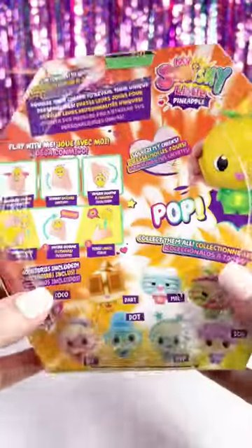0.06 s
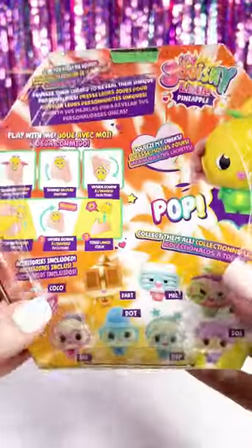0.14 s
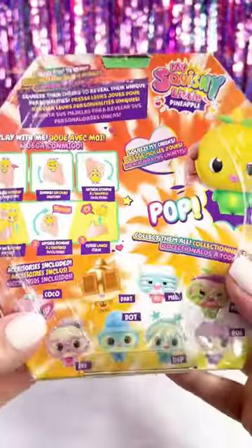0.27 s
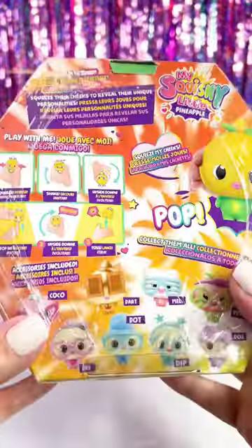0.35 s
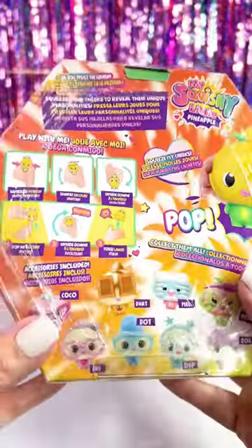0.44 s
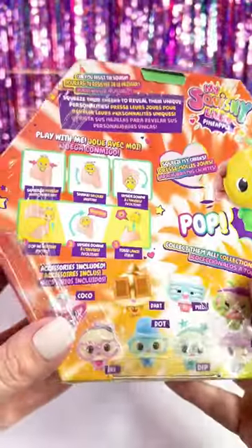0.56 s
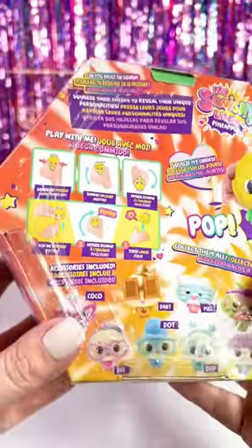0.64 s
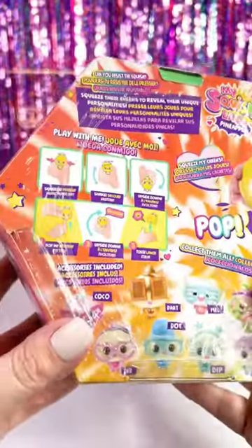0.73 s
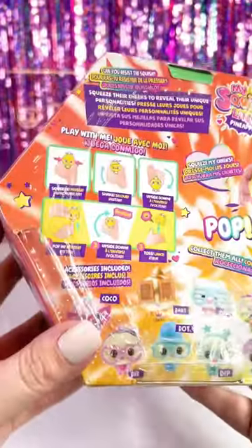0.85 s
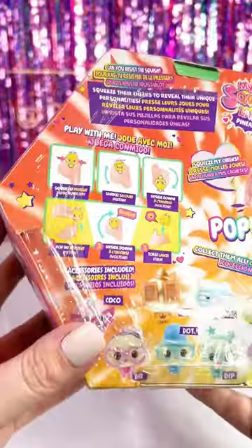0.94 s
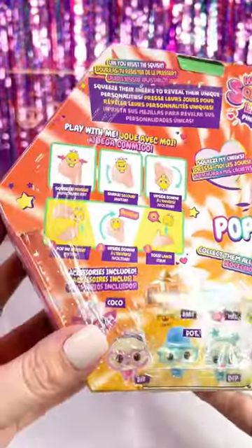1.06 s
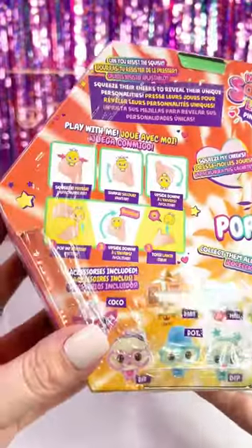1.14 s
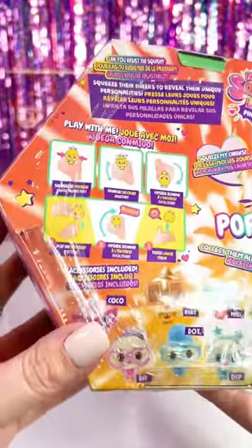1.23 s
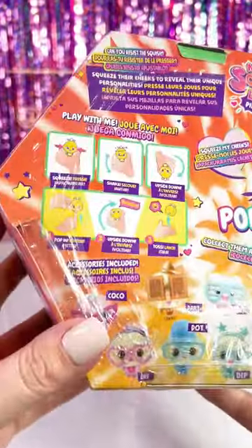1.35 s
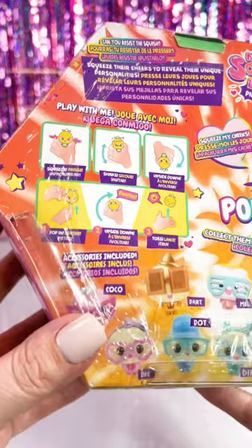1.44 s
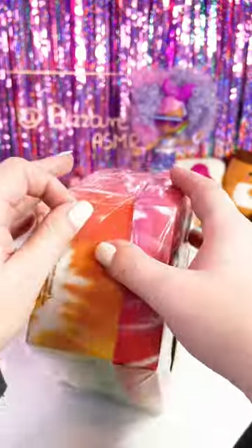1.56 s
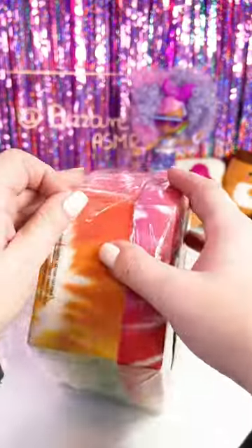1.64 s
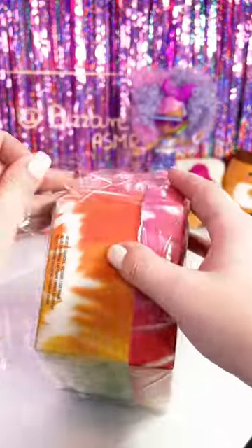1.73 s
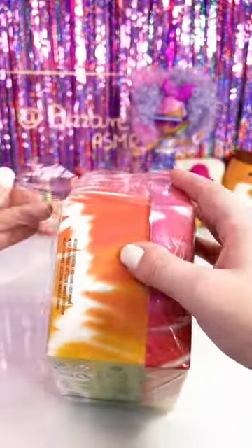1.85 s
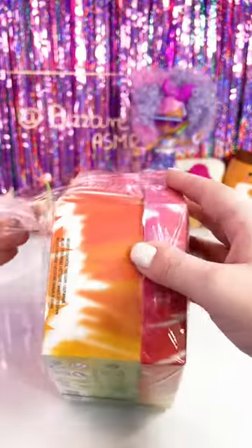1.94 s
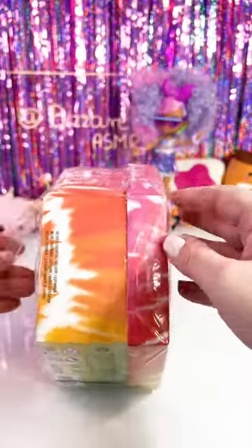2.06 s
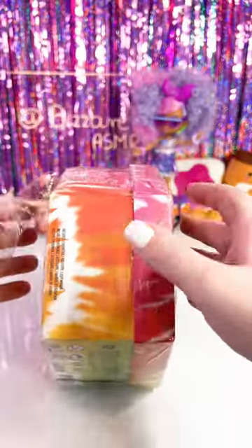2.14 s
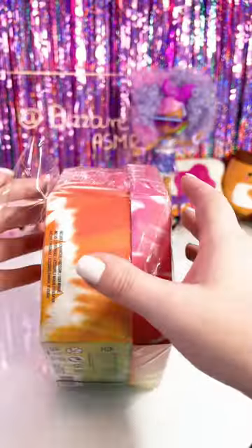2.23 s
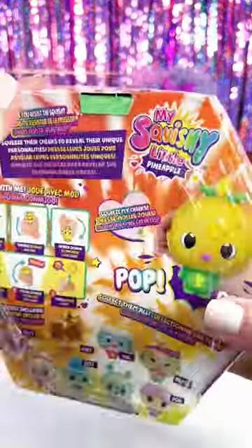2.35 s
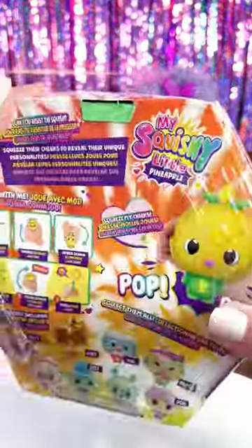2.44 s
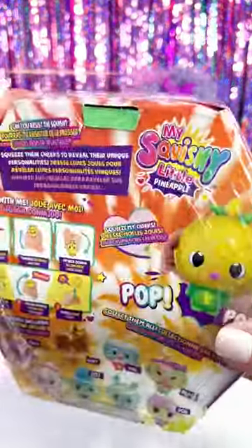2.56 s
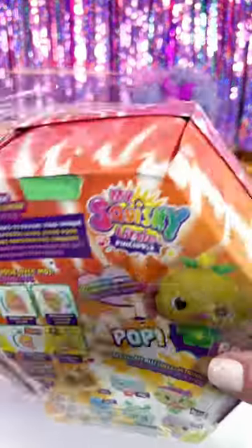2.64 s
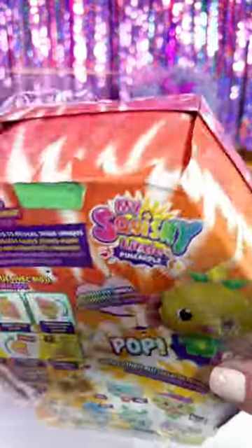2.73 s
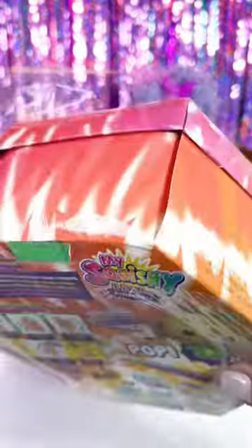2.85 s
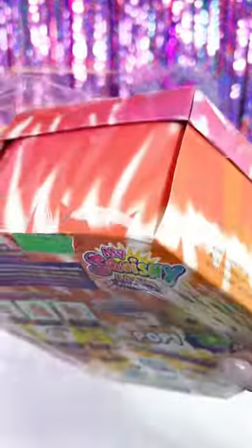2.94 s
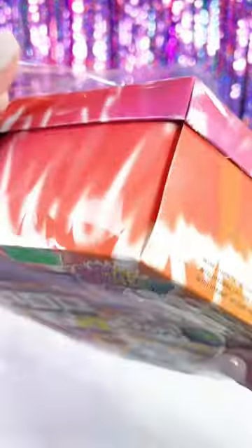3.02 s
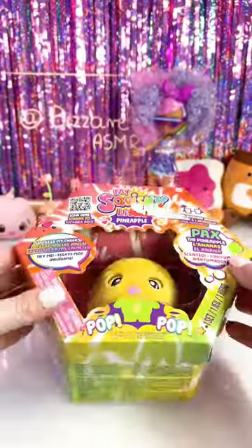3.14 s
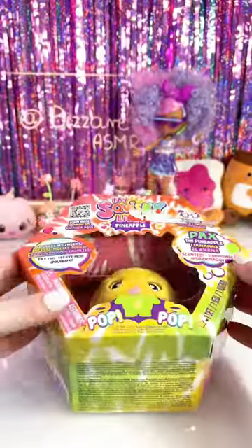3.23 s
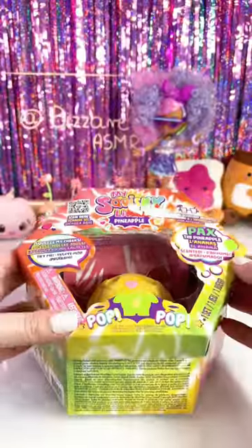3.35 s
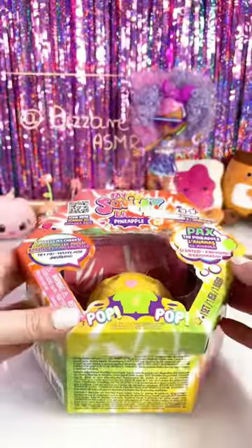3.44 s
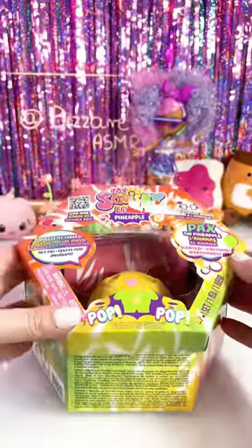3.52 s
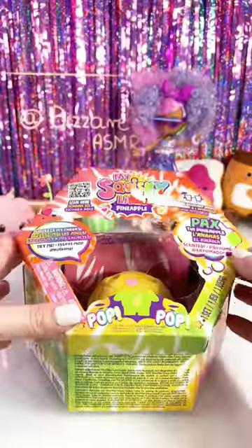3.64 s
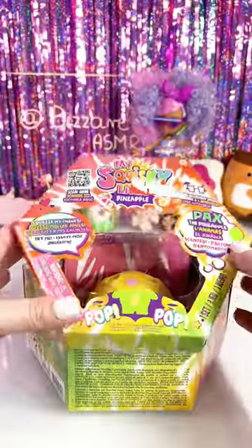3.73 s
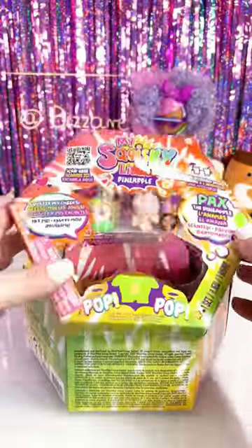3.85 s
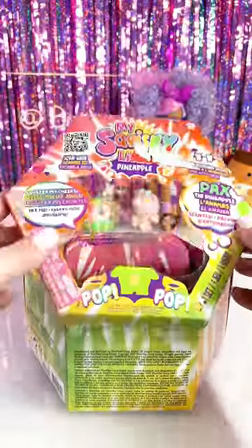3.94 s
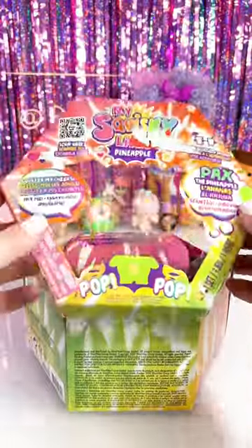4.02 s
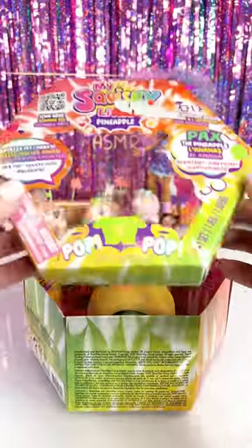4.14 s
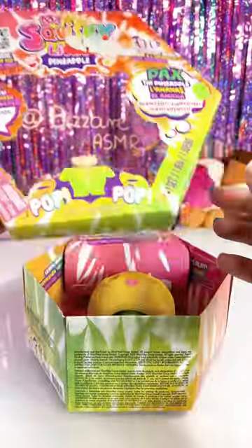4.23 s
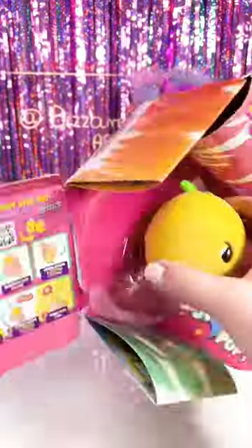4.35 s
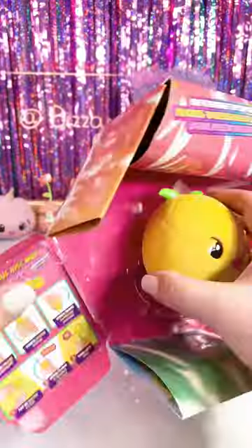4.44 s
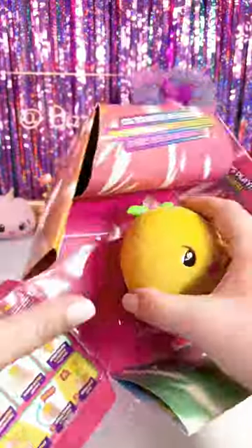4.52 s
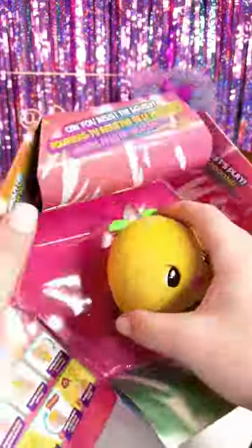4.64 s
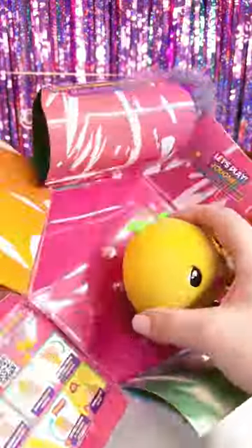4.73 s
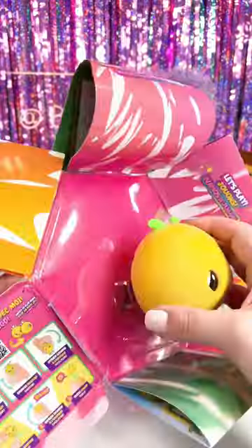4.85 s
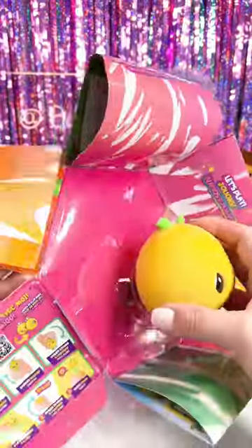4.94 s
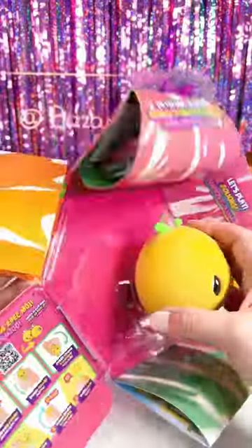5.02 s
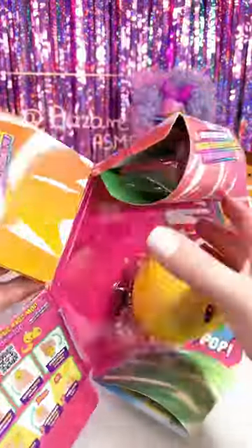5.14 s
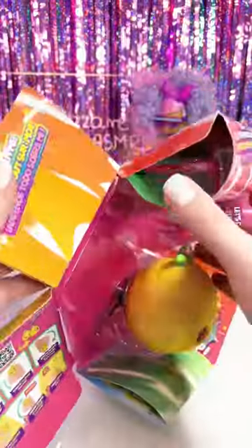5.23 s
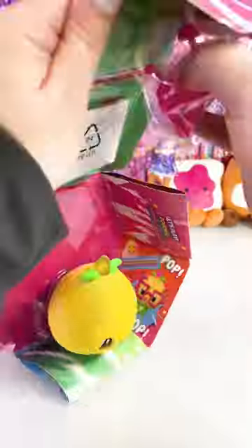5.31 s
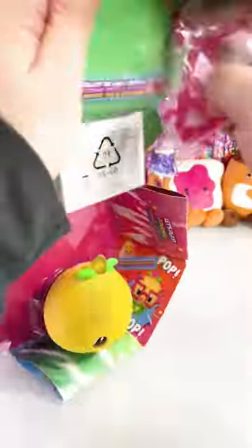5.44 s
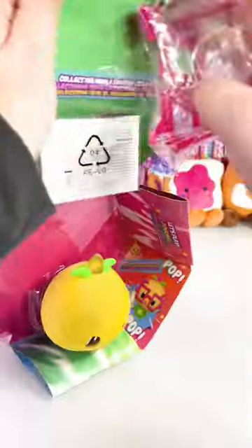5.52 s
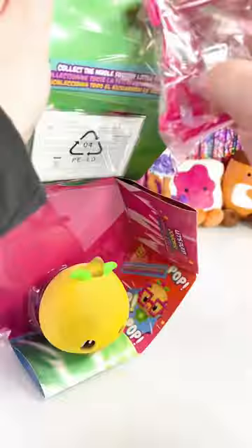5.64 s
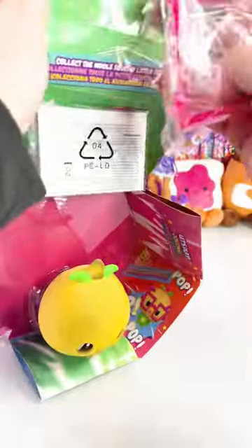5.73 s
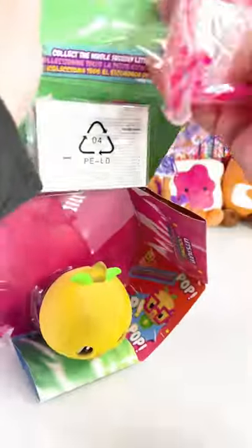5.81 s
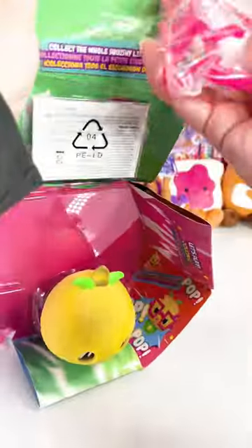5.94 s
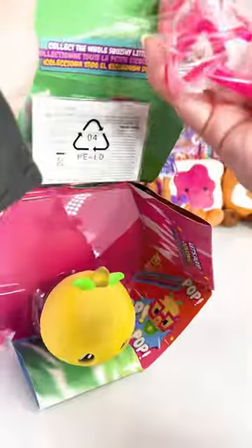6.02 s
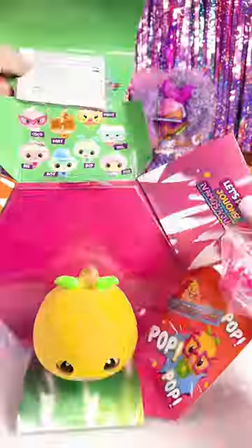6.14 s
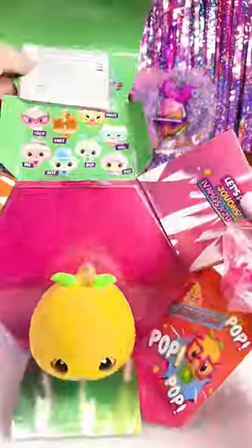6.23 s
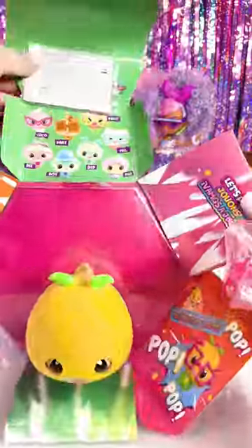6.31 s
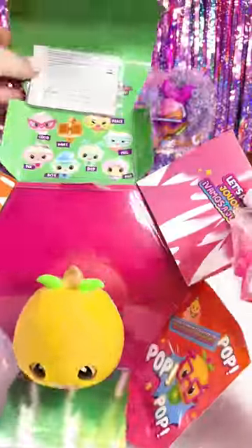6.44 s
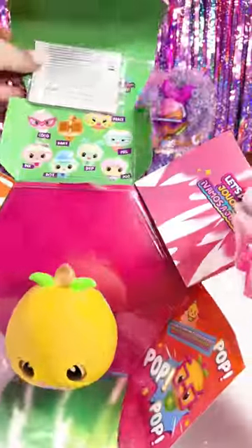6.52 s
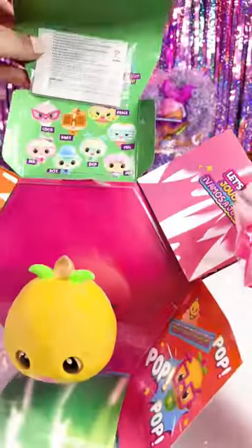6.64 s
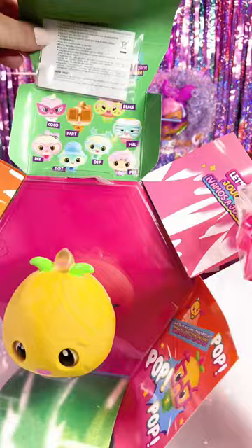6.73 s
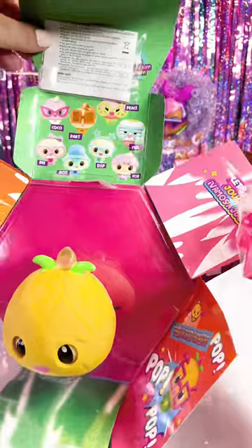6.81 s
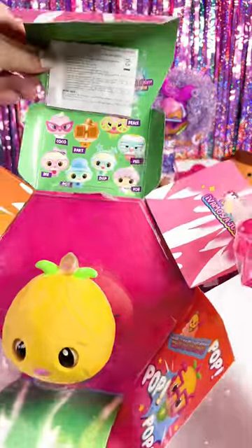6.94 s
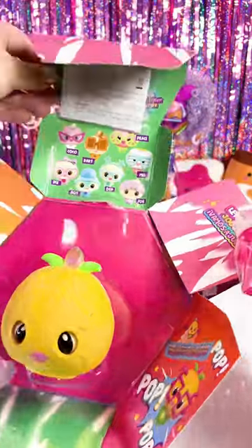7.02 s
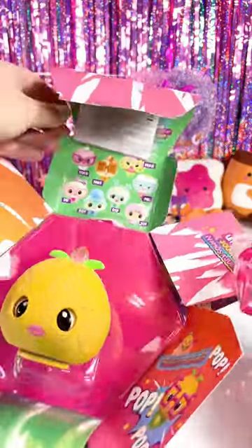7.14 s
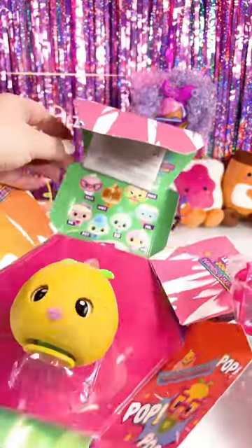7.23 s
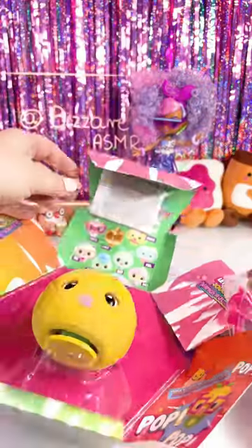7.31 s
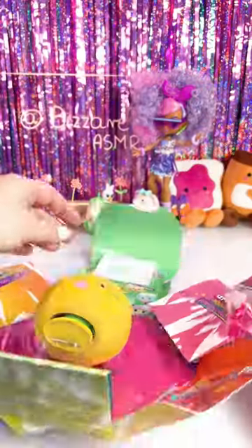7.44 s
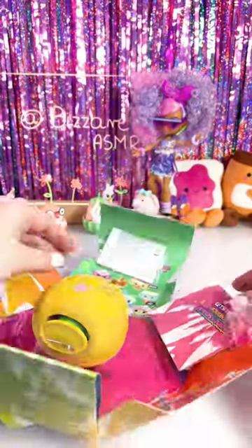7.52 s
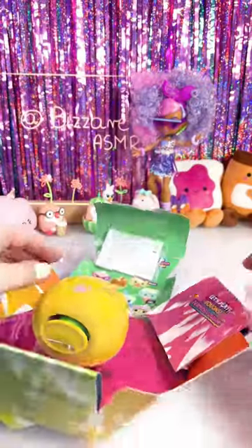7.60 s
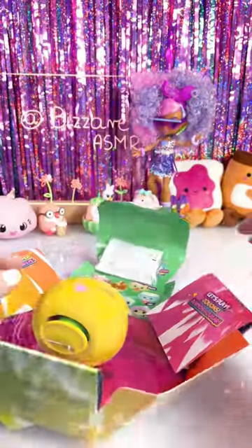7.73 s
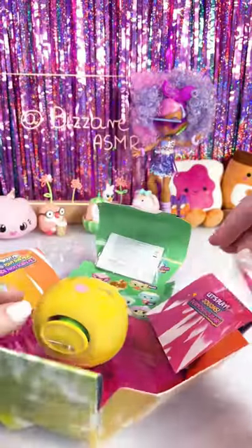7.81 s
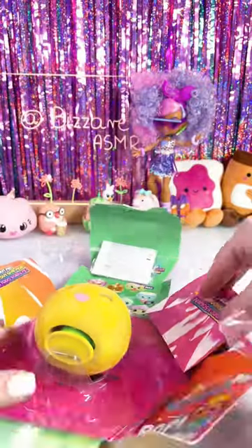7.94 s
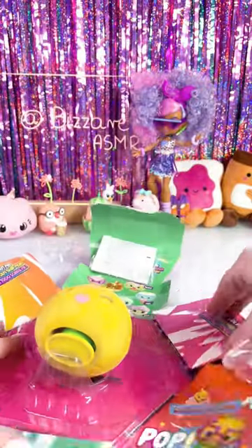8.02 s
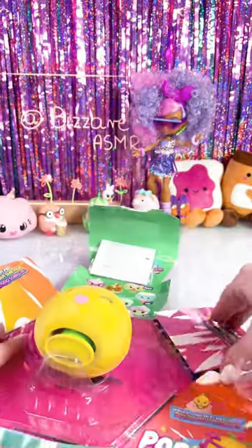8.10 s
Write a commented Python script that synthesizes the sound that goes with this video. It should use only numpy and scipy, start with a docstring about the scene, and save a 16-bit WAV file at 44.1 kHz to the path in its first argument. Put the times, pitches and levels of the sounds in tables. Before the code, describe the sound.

A thin cardboard box is turned, film wrap rips, then stiff flaps and a plastic tray snap and crackle in hard close bursts.

```python
"""Hands turn a cardboard box on a table close to a two-port microphone in a small quiet room.
Faint noise (room tone) lies under all; creases crunch softly, then the hands rest from 0.8 to 1.5 s.
Film wrap rips by stick and slip near 1.8 s; flaps and a stiff tray then snap as ringing noise bursts,
card rubs in clumps of pops, and the table thuds as dying low tones, strongest near 2.5 s.
The hardest snaps come between 4.7 and 6.8 s, the last two rounds with a loose chatter; snaps run to 8.1 s."""
import sys
import numpy as np
from scipy import signal
from scipy.fft import rfft, irfft, next_fast_len
from scipy.io import wavfile
from scipy.ndimage import uniform_filter1d

SR = 44100
rng = np.random.default_rng(int(sys.argv[2]) if len(sys.argv) > 2 else 0)


def wrap_up_sound(samples):
    """Save the sound to the file named by the first command line argument, as 16-bit audio."""
    columns = np.atleast_2d(samples).T
    # keep every value between -1 and 1, then stretch to whole-number steps
    tamed = np.clip(columns, -1, 1)
    steps = np.round(tamed * 32767).astype(np.int16)
    wavfile.write(sys.argv[1], SR, steps)


N = 360297

# spectrum shared by film and card sounds: frequency_hz, relative_density_db
CRACKLE_SPECTRUM = [(71, -44), (120, -1.5), (323, -4.5), (637, -10), (1020, -9), (1780, -8.5), (2690, -8),
                    (2980, -12.5), (4600, -7), (8020, -3), (12900, -10.5), (15200, -11.5), (16500, -51.5)]
# resonances of the box panels: frequency_hz, width_hz (nominal; wider dies sooner), relative_level_db
PANEL_MODES = [(270, 190, 12), (429, 103, 9.5), (495, 75, 0), (580, 150, 10), (1040, 60, 2)]


def gain_of(db):
    """Level: decibels become an amplitude ratio."""
    return 10 ** (np.asarray(db) / 20)


def evened(x):
    """Normalisation: scales x to unit root-mean-square."""
    return x / np.sqrt(np.mean(x ** 2) + 1e-20)


def read(points, hz):
    """Interpolation of a spectral curve along logarithmic frequency."""
    f, value = np.transpose(points)
    return np.interp(np.log(hz + 1), np.log(f + 1), value)


def shaped(x, points, low_hz, high_hz):
    """Linear filtering: colours x by a spectrum inside a band with steep skirts."""
    size = next_fast_len(len(x) + 512)
    hz = np.fft.rfftfreq(size, 1 / SR) + 1
    band = 1 / np.sqrt((1 + (low_hz / hz) ** 10) * (1 + (hz / high_hz) ** 10))
    spectrum = np.fft.rfft(x, size) * gain_of(read(points, hz)) * band
    return np.fft.irfft(spectrum, size)[..., :x.shape[-1]]


def burst(noise, rise_ms, fall_ms):
    """Impulsive excitation: noise swells and dies exponentially, with peak 1."""
    ms = np.arange(len(noise)) * 1000 / SR
    x = noise * (1 - np.exp(-ms / rise_ms)) ** 2 * np.exp(-ms / fall_ms)
    return x / abs(x).max()


def ports(x, lag):
    """Spatial cues: a fixed phase, a lag in samples by place, and scattering part the two ports."""
    # left port over right: frequency_hz, phase_rad
    port_phase = [(100, 0), (4200, 0), (5600, -.8), (7000, -1.1), (11600, -1.4), (16000, -1.6)]
    # sound scattered by hands and box, opposite in sign on the ports: frequency_hz, level_db
    scattered = [(100, -24.5), (350, -19.5), (700, -11), (2800, -20.5), (5000, -8.5), (12000, -16)]
    size = next_fast_len(len(x) + 512)
    hz = np.fft.rfftfreq(size, 1 / SR)
    half = np.exp(.5j * (read(port_phase, hz) - 2 * np.pi * hz * lag / SR))
    bounce = burst(rng.standard_normal(256), 0.17, 0.79)
    side = gain_of(read(scattered, hz)) * rfft(bounce / np.linalg.norm(bounce), size)
    return irfft(rfft(x, size) * np.array([half + side, 1 / half - side]), size)[:, :len(x)]


def room_tone():
    """Random noise: low rumble and a soft hiss band near 2 kHz waver slowly in level."""
    # frequency_hz, relative_density_db
    tone_spectrum = [(20, -18), (35, -5.5), (66, 0), (138, -16), (260, -15.5), (400, -21), (870, -29),
                     (1280, -22), (1600, -27), (1850, -15.5), (2300, -16.5), (2700, -37), (8000, -34.5),
                     (16000, -52)]
    tone_db = -74
    mid, side = rng.standard_normal((2, N))
    waver = gain_of(0.74 * evened(uniform_filter1d(rng.standard_normal(N), 6000)))
    side = .5 * shaped(side, tone_spectrum, 600, 19000)
    mid = shaped(mid, tone_spectrum, 34, 17000)
    return gain_of(tone_db) * waver * evened(np.array([mid + side, mid - side]))


def echoes(x):
    """Reverberation: dense tails decay at a rate per band, alike on both ports in the bass."""
    # frequency_hz, t60_s
    decay_times = [(150, 0.27), (400, 0.082), (1000, 0.091), (2800, 0.12), (7300, 0.15), (15000, 0.093)]
    # left-right likeness of the tails: frequency_hz, likeness (0 to 1)
    likeness = [(400, 0.99), (1000, 0.71), (2400, 0.82), (6000, 0.15), (15000, 0.056)]
    # soft furnishings dull the echoes: frequency_hz, level_db
    furnishings = [(2500, 0), (5000, -1.5)]
    out = np.zeros((2, N))
    for k in range(3):
        hz, t, z = signal.stft(rng.standard_normal((2, SR // 3)), SR, nperseg=128)
        same = np.clip(read(likeness, hz), 0, 1)[:, None]
        right = same * z[0] + np.sqrt(1 - same ** 2) * z[1]
        decay_db = read(furnishings, hz)[:, None] - 60 * t / read(decay_times, hz)[:, None]
        z = np.array([z[0], right]) * gain_of(decay_db)
        tail = np.pad(signal.istft(z, SR, nperseg=128)[1], ((0, 0), (130, 0)))  # 2.9 ms before the tail
        # the three tails take turns, so repeated sounds do not excite one fixed pattern
        turn = np.sqrt(2 / 3) * np.cos(np.pi * (np.arange(N) / 3000 + k / 3))
        out += signal.oaconvolve(turn * x.mean(0)[None], tail / np.linalg.norm(tail[0]), axes=1)[:, :N]
    return out


def grip():
    """Control of friction: rustle level, film sheen and card body over time, in dB."""
    # start_s, rustle_level_db, sheen_db (film, re rustle), body_db (card, re rustle)
    hands = [(0.0, -58, 0.5, -1.5), (0.241, -73, 8.5, 9), (0.34, -75.5, -28, -17), (1.5, -80.5, 7, 2),
             (1.62, -64, 2.5, 5), (1.772, -47, -1, 8.5), (1.901, -52.5, 6.5, 13), (2.25, -60, -2, -2),
             (2.699, -46.5, 7.5, 5.5), (2.829, -56.5, 1.5, -4), (2.97, -56, 17, 8.5),
             (3.14, -57.5, -7.5, 5), (3.497, -64, -0.5, 12.5), (3.95, -74, -11.5, 1.5),
             (4.161, -58.5, -3, -8), (4.299, -74.5, -16, -8), (4.569, -58, -1.5, 8), (4.77, -37.5, -6, 1.5),
             (5.001, -53, -17, 8.5), (5.3, -58, 2, -2), (5.451, -45, -7, -12), (5.56, -55, 3.5, 4.5),
             (5.979, -53, 0.5, -7.5), (6.25, -55.5, -9, 9.5), (6.501, -61, 0, 0.5), (6.72, -63, -13.5, 4.5),
             (7.149, -59, -3.5, -1.5), (7.2, -56, -20, 9), (7.299, -56, -18, 6.5), (7.501, -40, -4, -1.5),
             (7.722, -72.5, -8, -2), (8.047, -41, -3, -6), (8.17, -52, -1, -15)]
    s, *columns = np.transpose(hands)
    return [np.interp(np.arange(N) / SR, s, db) for db in columns]


def table():
    """Damped vibration: bumps are wandering tones that sag, then die; a loose shudder follows the grip."""
    # the box bumps or drags on the table: start_s, level_db, pitch_hz (mean), contact_s
    bumps = [(0.0, -47, 65.6, 0.021), (0.603, -53, 79, 0.11), (1.699, -51, 90, 0.023),
             (1.963, -45, 88, 0.006), (2.088, -40, 57, 0.072), (2.394, -22.5, 95.5, 0.0097),
             (2.503, -21.5, 76.5, 0.013), (2.609, -28.5, 79, 0.011), (2.661, -27.5, 90, 0.018),
             (2.719, -32, 59, 0.038), (2.858, -31, 57.6, 0.24), (3.312, -40, 57.6, 0.13),
             (4.07, -47, 60.5, 0.035), (4.117, -38.5, 54.8, 0.1), (4.26, -49, 56, 0.038),
             (4.347, -38, 172, 0.0088), (4.729, -38, 69.6, .08), (5.122, -39.5, 74.6, 0.075),
             (5.349, -43, 75.5, 0.012), (5.464, -31.5, 62.5, 0.053), (5.66, -41, 76, 0.088),
             (5.949, -37, 73.5, 0.013), (6.109, -39, 72, 0.011), (6.407, -41, 84, 0.035),
             (6.759, -43, 70, 0.024), (7.952, -50, 82, 0.033)]
    # shudder of table and stand: frequency_hz, relative_density_db
    thud_spectrum = [(30, -4.5), (70, 4), (102, -3.5), (140, -11), (200, -15), (260, -43.5)]
    rise_s, sag_db_per_s, release_db_per_s = 0.0054, 37, 606.5
    shudder_db, shudder_follows = -53, 0.57  # level at a card body of -46.5 dB; dB per dB of card body
    wander = 1 + 0.084 * evened(uniform_filter1d(rng.standard_normal(N + SR), size=2500))
    shudder = evened(shaped(rng.standard_normal(N + SR), thud_spectrum, 40, 220))
    rustle_db, _, body_db = grip()
    out, t = np.zeros(N + SR), np.arange(SR // 2) / SR
    for s, db, hz, contact_s in bumps:
        span = slice(round(s * SR), round(s * SR) + len(t))
        fall_db = sag_db_per_s * t + release_db_per_s * np.maximum(t - rise_s - contact_s, 0)
        tone = np.sqrt(2) * np.sin(2 * np.pi * np.cumsum(hz * wander[span]) / SR)
        out[span] += np.minimum(t / rise_s, 1) * gain_of(db - fall_db) * (tone + 0.39 * shudder[span])
    shudder_level_db = shudder_db + shudder_follows * (rustle_db + body_db + 46.5)
    return out[:N] + gain_of(shudder_level_db) * shudder[:N]


def chatter():
    """Repeated impact: uneven fading taps ring the same few modes, each in its own mix."""
    # a loose part chatters on after a hard snap: start_s, level_db, fade_db_per_s
    rattles = [(6.43, -30.5, 99), (6.768, -34, 302.5)]
    # modes of the loose part: frequency_hz, width_hz, relative_level_db
    loose_modes = [(700, 130, -3), (1720, 220, -1), (2730, 260, -6)]
    mean_taps_per_s = 75
    t, out = np.arange(N) / SR, np.zeros(N)
    pace = 1 + .4 * evened(uniform_filter1d(rng.standard_normal(N), size=400))
    turns = np.cumsum(mean_taps_per_s * pace) / SR
    level = sum((t > s) * gain_of(db - fade * np.maximum(t - s, 0)) for s, db, fade in rattles)
    taps = np.diff(np.floor(turns), prepend=0) * level
    for hz, w, db in loose_modes:
        ring = gain_of(db - 27 * w * t[:1024]) * np.sin(2 * np.pi * hz * t[:1024])
        out += signal.oaconvolve(taps * gain_of(4 * rng.standard_normal(N)), ring)[:N]
    return ports(out, 0)


def crackle(per_s, spread_db, fall_ms, hiss, force):
    """Crackling noise: creases pop in random clumps from five places; a light touch weakens the pops."""
    out = np.zeros((2, N))
    clumps = gain_of(7.7 * evened(uniform_filter1d(rng.standard_normal(N), size=900)))
    for lag in np.linspace(-.7, .7, num=5):
        happens = rng.random(N) < clumps * per_s / SR
        size = gain_of(spread_db * np.minimum(rng.exponential(1, N), 4)) * happens
        pops = np.zeros(N)
        # three pop colours at each place
        for k, hz in enumerate(np.geomspace(900, 9000, num=3) * rng.uniform(0.14, 0.84, size=3)):
            colour = [(hz / 3, -9.0), (hz, 0), (hz * 3, -9.0)]
            pop = burst(shaped(rng.standard_normal(400), colour, 100, 20000), 0.07, fall_ms)
            pops += signal.oaconvolve(size * (np.arange(N) % 3 == k), pop)[:N]
        rub = hiss * np.sqrt(clumps) * rng.standard_normal(N)
        out += ports(force * evened(pops) + rub, lag)
    return out


def handling():
    """Radiation by band: the same pops sound through film and card faces, slower ones through the box."""
    # the hands rest: from_s, to_s
    rest = (.8, 1.51)
    t, (rustle_db, sheen_db, body_db) = np.arange(N) / SR, grip()
    moving = (t < rest[0]) | (t > rest[1])
    rustle, body, sheen = gain_of([rustle_db, rustle_db + body_db, rustle_db + sheen_db]) * moving
    force = np.clip((rustle_db + 72) / 24, .25, 1)  # firmer handling pops more
    pops = crackle(310, 4.4, 0.95, 0.41, force)
    knocks = crackle(110, 3.5, 4.3, 1.4, force)
    layers = [(rustle, pops, 900, 3200), (sheen, pops, 3200, 20000), (body, knocks, 200, 850)]
    return sum(level * evened(np.array([shaped(v, CRACKLE_SPECTRUM, lo, hi) for v in x]))
               for level, x, lo, hi in layers)


def rip():
    """Stick-slip friction: uneven clicks follow the pull, in six shapes by turns, and ring the box."""
    # the wrap rips along its seam: start_s, slips_per_s (mean), level_db
    seam = [(1.702, 190, -18.5), (1.72, 230, -15), (1.771, 175, -17), (1.8, 73, -35), (1.846, 110, -27),
            (1.871, 113, -21), (1.905, 130, -49)]
    s, per_s, db = np.transpose(seam)
    t = np.arange(N) / SR
    pace = 1 + 0.43 * evened(uniform_filter1d(rng.standard_normal(N), 300))
    turns = np.cumsum(np.interp(t, s, per_s, 0, 0) * pace) / SR
    slip_db = np.interp(t, s, db) + 2.0 * rng.standard_normal(N)
    slips = np.diff(np.floor(turns), prepend=0) * gain_of(slip_db)
    clicks = [burst(shaped(z, CRACKLE_SPECTRUM, 1100, 13000), 0.017, 0.74)
              for z in rng.standard_normal((6, 512))]
    ring = sum(gain_of(level - 36 * w * t[:2048]) * np.sin(2 * np.pi * hz * t[:2048])
               for hz, w, level in PANEL_MODES)
    panels = gain_of(-12.0) * signal.oaconvolve(slips, ring / abs(ring).max())[:N]
    film = sum(signal.oaconvolve(slips * (turns // 1 % 6 == k), c)[:N] for k, c in enumerate(clicks))
    return ports(panels + film, 0.17)


def spread(x, ms_at_1k):
    """Dispersion: bending waves in a sheet run faster the higher they are, so a snap glides downward."""
    hz = np.fft.rfftfreq(2 * len(x), 1 / SR)
    # the linear term advances all alike, so that 16 kHz arrives undelayed
    phase = 4 * np.pi * ms_at_1k * (np.sqrt(hz / 1000) - hz / 1000 / 8)
    return irfft(rfft(x, 2 * len(x)) * np.exp(-1j * phase), 2 * len(x))[:len(x)]


def buckle(level_db, box_db, edge_db, centre_hz, rise_ms, fall_ms, noise, detune):
    """Buckling: a fold gives way with a bright edge, a card face ringing about a centre, and box modes."""
    grid = np.geomspace(100, 17000, num=60)
    octaves = np.log2(grid / centre_hz)
    dulling_db = 0.31 * min(edge_db, 0) * np.maximum(octaves, 0)  # a dull blow also fades above its centre
    face_db = read(CRACKLE_SPECTRUM, grid) + 7.8 * np.exp(-octaves ** 2 / 0.13) + dulling_db
    face = np.transpose([grid, face_db])
    edge = burst(shaped(noise[0], CRACKLE_SPECTRUM, 3200, 20000), .45 * rise_ms, .8 * fall_ms)
    middle = burst(shaped(noise[1], face, 560, 3340), rise_ms, fall_ms)
    t, blow = np.arange(noise.shape[1]) / SR, burst(noise[2], rise_ms, fall_ms + 2.0)
    modes = sum(gain_of(db - 37.3 * w * t) * np.sin(2 * np.pi * hz * d * t)
                for (hz, w, db), d in zip(PANEL_MODES, detune))
    no_bass = signal.butter(2, 170, "high", fs=SR, output="sos")  # the box ring keeps out of the deep bass
    ring = signal.sosfilt(no_bass, signal.fftconvolve(blow, modes)[:len(t)])
    mix = middle + gain_of(edge_db) * edge + gain_of(box_db) * ring / abs(ring).max()
    return gain_of(level_db) * spread(mix, 1.168)


def played(rows, size, grain_db, spike):
    """Superposition: each event has its own fine shape and place; rows end with rise_ms, fall_ms."""
    out = np.zeros((2, N + size))
    noise = rng.standard_normal((len(rows), 4, size))
    draw = rng.standard_normal((len(rows), 1 + len(PANEL_MODES)))
    noise[:, :2, 24] = spike  # a nonzero spike is one sharp break amid the noise
    for (s, *row), z, d in zip(rows, noise, draw):
        grain = gain_of(grain_db * evened(uniform_filter1d(z[3], size=40)))  # uneven creases
        at = round(s * SR)
        out[:, at:at + size] += ports(buckle(*row, z[:3] * grain, 1 + .06 * d[1:]), .25 * d[0])
    return out[:, :N]


def crunches():
    """Successive buckling: longer, grainy clumps of creases whose swell grows with their length."""
    # start_s, level_db (card face), box_db and edge_db (re card face), centre_hz, fall_ms
    clump_rows = [(0.2245, -47.5, -4, 4, 1190, 22), (0.5152, -52, 8, -14, 940, 3.2),
                  (0.5628, -53, 14.5, -18, 950, 3.4), (0.573, -47, 2, -34, 950, 2.5),
                  (0.605, -44.5, 9.5, -23, 960, 4.6), (0.617, -46, 5.5, -20, 960, 1.9),
                  (0.6485, -43, 9, -19, 960, 4), (0.6582, -41.5, 5, -12, 970, 2.3),
                  (1.93, -36, 0, 12, 1970, 3.8), (2.5336, -41.5, 14, 14, 1030, 4.3),
                  (2.5918, -19, -3.5, 4.5, 1520, 52), (2.6601, -21, -7.5, 8.5, 2620, 17),
                  (2.707, -21.5, -0.5, 10, 1090, 9.8), (2.9496, -27.5, -25, 12, 2330, 11.7),
                  (3.214, -49, 18, -27, 840, 4.2), (3.278, -31.5, 5.5, -3.5, 751, 13),
                  (3.3049, -22, -4, 2.5, 1200, 9.7), (3.377, -29, -2, -5, 1100, 13),
                  (3.464, -36.5, -5, -36, 1010, 3.9), (4.0565, -50.5, -28.5, -4, 2080, 11),
                  (4.614, -21.5, -18, -6, 870, 6.9), (4.6465, -18, -0.5, -11, 1040, 3.1),
                  (4.7574, -14.5, -15, -28, 1240, 3.3), (4.843, -18, -5, 2.5, 2000, 16),
                  (4.971, -22.5, -12, 1, 2230, 13.5), (4.9809, -7.5, -1.5, 1, 1040, 1.95),
                  (5.0263, -23.5, -15, -23, 1200, 6.8), (5.0761, -18, -3, -2.5, 1070, 18.6),
                  (5.12, -14, -7, -5, 1520, 21), (5.176, -24.5, -7, -2, 2200, 3.8),
                  (5.1945, -16, -1, -7.5, 830, 5.3), (5.346, -27, -1, 6.5, 2540, 22.5),
                  (5.4393, -18, -16, 6, 2170, 2.5), (5.459, -8.5, -5.5, 3.5, 1200, 18),
                  (5.634, -22, -8, 3, 1030, 16), (6.406, -8, -38, -1.5, 2740, 5.7),
                  (6.4435, -23.5, -14, -17, 700, 24.6), (7.0081, -45.5, 5, 4, 776, 8.6),
                  (7.2935, -20.5, -3, 1.5, 1870, 20), (7.411, -40, -25, 8, 2100, 7.9),
                  (7.4209, -11.5, -8, -5.5, 1900, 6.3), (7.45, -20.5, -36, 7, 1550, 4.4),
                  (7.509, -23, -9, 2.5, 2240, 20), (7.5913, -26.5, -4, -5, 1610, 30),
                  (7.645, -31.5, -1, -3.5, 2050, 8.1)]
    return played([(*row, 0.15 * ms, ms) for *row, ms in clump_rows], size=6144, grain_db=6.0, spike=0)


def snaps():
    """Sudden release of strain: film, tray and card each give way in one quick burst."""
    # start_s, level_db (card face, before the common lift in scene),
    # box_db and edge_db (re card face), centre_hz
    snap_rows = [(0.413, -40.5, -65, 0.5, 1960), (1.5153, -55, -5, 7.5, 2500), (1.5891, -37, -14, 10, 2750),
                 (1.6658, -36.5, 0, 12, 2600), (1.6915, -33.5, -4, 16, 2560),
                 (1.6961, -27.5, -25.5, 9.5, 2400), (1.782, -28, -8.5, -1, 2040),
                 (1.792, -29, -18, -10, 2200), (1.843, -29, -6, 6.5, 1790), (1.858, -28, -5, 8.5, 2520),
                 (1.943, -29.5, -16, -17, 2160), (1.952, -44.5, -19, 23.5, 696),
                 (1.968, -27.5, 3.5, -31, 1260), (2.064, -38, -0.5, 2, 907), (2.169, -28, -31, 12.5, 2700),
                 (2.2544, -43.5, 1, -17, 2300), (2.388, -37, 8, 9, 2470), (2.469, -33, -29, 9.5, 2500),
                 (2.4932, -17, -22, 2, 2390), (2.499, -27, -0.5, 9, 833), (2.593, -26.5, -7, 9, 2000),
                 (2.614, -19.5, -7.5, 6, 2182), (2.6315, -30, -18, 16, 2600),
                 (2.6402, -19, -6.5, 10.5, 1560), (2.7265, -41.5, -16.5, 17, 2600),
                 (2.7363, -33, -17, 1, 2600), (2.827, -30.5, -25, 1.5, 1880), (2.8745, -12, -9, 3, 660),
                 (2.9212, -30.5, -5, 16.5, 2970), (2.9367, -26.5, -14, 10.5, 3040),
                 (2.9639, -26.5, -23, -0.5, 1720), (3.016, -27, -23, 12.5, 2850),
                 (3.0855, -42, 8.5, 6, 1140), (3.2454, -39.5, 0, 13.5, 1530), (3.3059, -13.5, 1, -35, 1160),
                 (3.6102, -49.5, 4, 17, 748), (3.6792, -31, -5.5, -7.5, 997), (4.114, -42.5, -15, -6, 2600),
                 (4.241, -46.5, -11, -2, 970), (4.347, -39.5, 0.5, 14.5, 1015),
                 (4.5096, -36.5, -23, -9, 810), (4.551, -39, -19, -14, 1340),
                 (4.6776, -28.5, -23, -3, 1260), (4.736, -10.5, -13.5, -1, 1410),
                 (4.7744, -20.5, -9, 7.5, 1240), (5.06, -30, -11, 4.5, 2280),
                 (5.1455, -12.5, -14.5, -11, 1180), (5.215, -31, -24, 3.5, 2300),
                 (5.286, -46.5, -11, 18, 1590), (5.411, -41.5, -19, 20, 2350),
                 (5.432, -35.5, -9.5, 9.5, 1800), (5.451, -18.5, -10, 1.5, 1800),
                 (5.48, -21, -7.5, 11.5, 2400), (5.537, -31, -19, 11.5, 1555),
                 (5.674, -14.5, -7.5, 9, 1220), (5.694, -14.5, -5, 9, 1200), (5.713, -10.5, -22, 0.5, 1100),
                 (5.736, -9, -18.5, 2.5, 1390), (5.748, -23.5, -9, -3, 1340),
                 (5.8274, -29.5, -11.5, 13.5, 2510), (5.8611, -9.5, -19, 4, 930),
                 (5.9449, -12.5, -7.5, 8.5, 1900), (5.9937, -13, -13, 8.5, 920),
                 (6.014, -39.5, -18.5, 15, 1710), (6.041, -16.5, -11.5, 9.5, 2260),
                 (6.108, -11.5, -22.5, 4.5, 820), (6.1105, -11.5, -24, 11, 700),
                 (6.343, -27.5, -19, 3, 3500), (6.408, -10, -5, -3, 2500), (6.5787, -30.5, -43.5, -2, 740),
                 (6.758, -13.5, -12, 6.5, 1190), (6.903, -32.5, -11.5, -20, 710),
                 (6.9396, -34.5, -4.5, -5.5, 1640), (7.1013, -46, -31, 2, 2310),
                 (7.1555, -35.5, -11, 3.5, 2260), (7.1879, -26, -0.5, 6.5, 700), (7.22, -28, 4, 7.5, 770),
                 (7.2467, -27.5, 0.5, 16.5, 700), (7.2554, -27.5, 1.5, 7, 1670),
                 (7.293, -25.5, -12, 7, 1700), (7.305, -28, -7, -9, 2000), (7.3138, -26, -6, -20, 2180),
                 (7.3393, -25, -42, -5.5, 2370), (7.354, -20.5, -28, 1, 2400),
                 (7.427, -12.5, -26, 0.5, 2050), (7.4392, -13, -27, -16, 1750),
                 (7.565, -37.5, -23, 6.5, 1980), (7.751, -35.5, -11.5, -3.5, 1710),
                 (7.858, -35, -40, -10, 1700), (7.904, -32, -9, -2.5, 2680), (7.962, -21, -14.5, -6, 2600),
                 (8.0176, -38, -16, 22, 2066), (8.0914, -16, -14.5, -5.5, 1930)]
    return played([(*row, .7, 1.15) for row in snap_rows], size=2048, grain_db=4.0, spike=5.1)


def scene():
    """Superposition of direct sound, its echoes, handling, table and room."""
    clicks = gain_of(5.0) * snaps() + crunches() + rip() + chatter()
    return clicks + gain_of(-8.5) * echoes(clicks) + handling() + table() + room_tone()


def record(dry):
    """Saturation and band limiting: the loudest snaps clip softly; a slope and steep edge end the treble."""
    edge_hz = 16000
    soft = .95 * np.tanh(dry / .95)
    corners_hz = [0, edge_hz - 300, edge_hz, edge_hz + 700, edge_hz + 1000, SR / 2]
    taps = signal.firwin2(401, corners_hz, [1, 1, .15, .04, 0, 0], window=("kaiser", 8), fs=SR)
    return signal.oaconvolve(soft, taps[None], "same")


dry = scene()
out = record(dry)
wrap_up_sound(out)
```